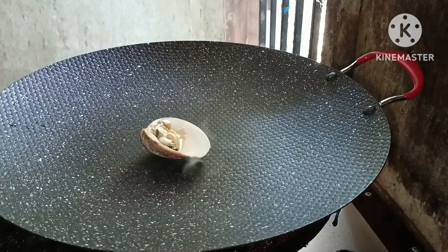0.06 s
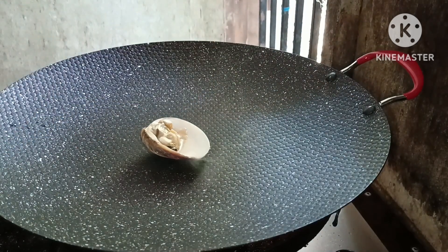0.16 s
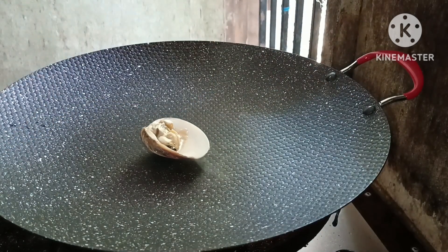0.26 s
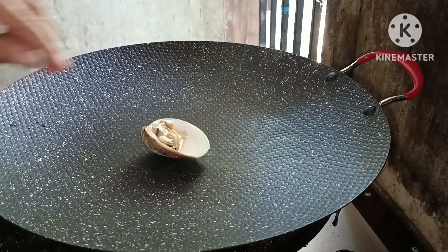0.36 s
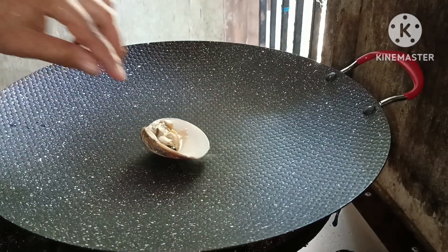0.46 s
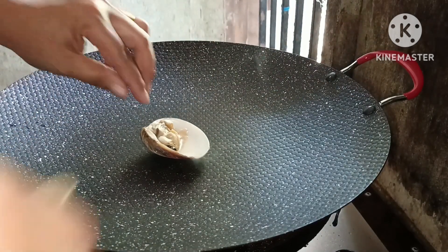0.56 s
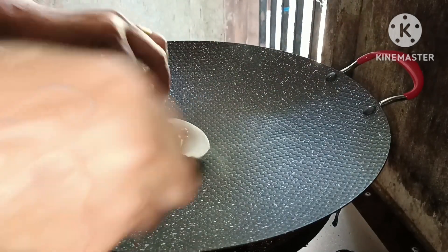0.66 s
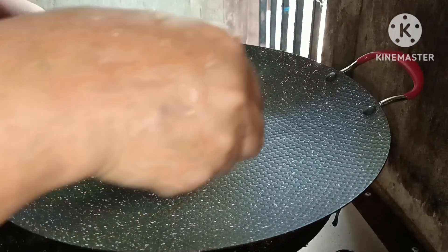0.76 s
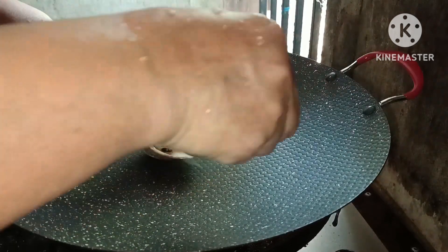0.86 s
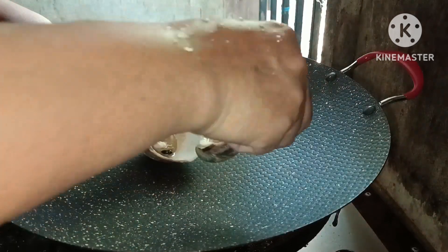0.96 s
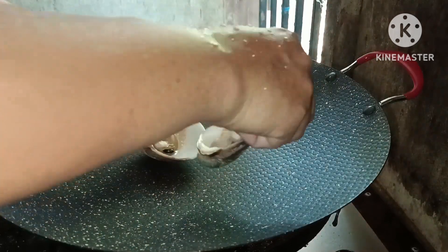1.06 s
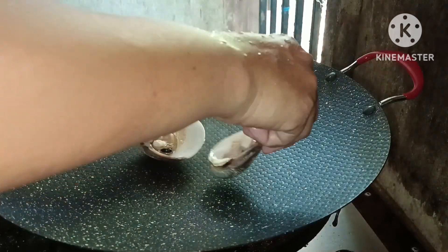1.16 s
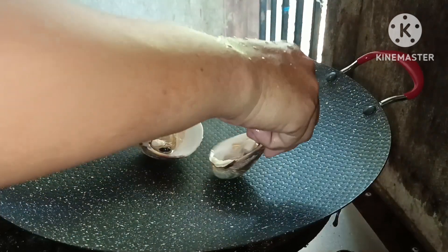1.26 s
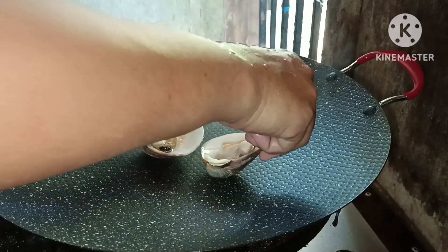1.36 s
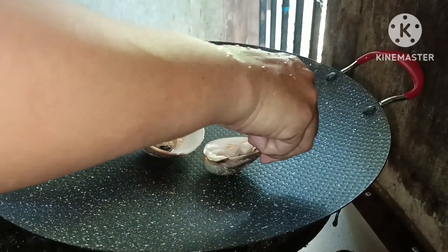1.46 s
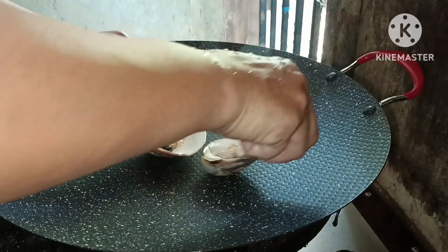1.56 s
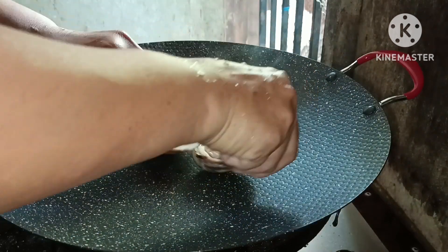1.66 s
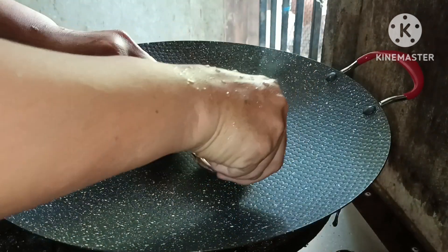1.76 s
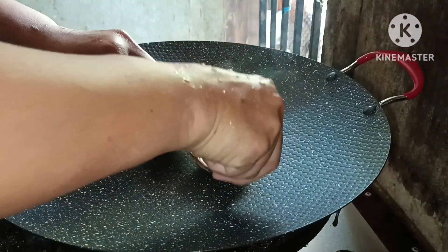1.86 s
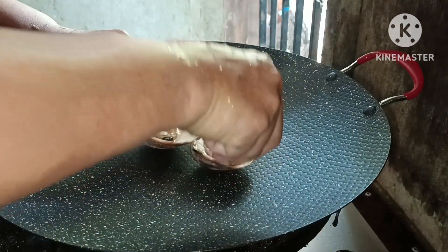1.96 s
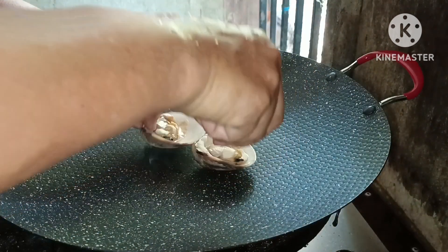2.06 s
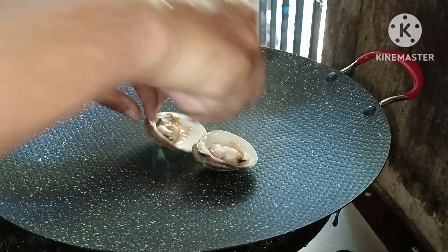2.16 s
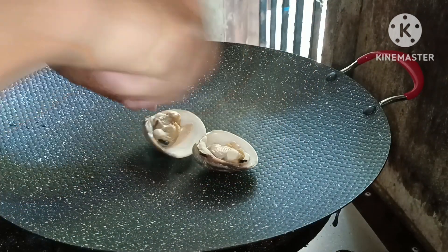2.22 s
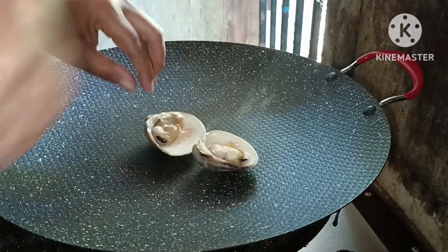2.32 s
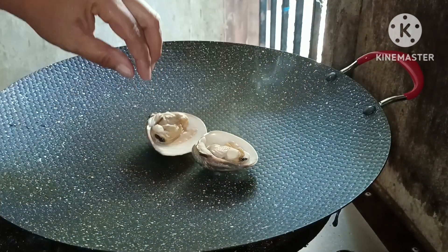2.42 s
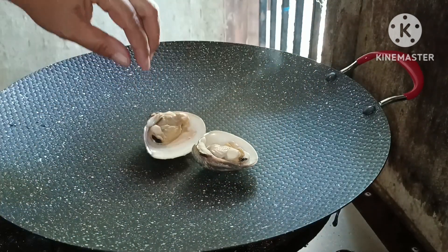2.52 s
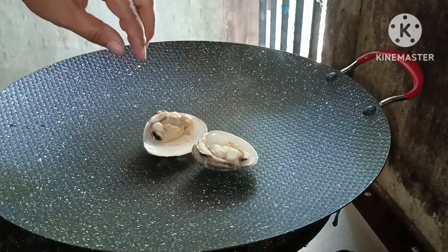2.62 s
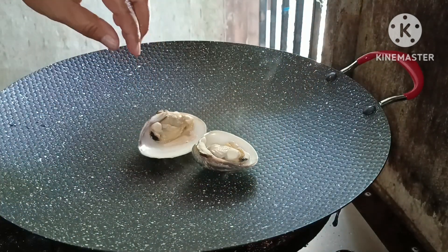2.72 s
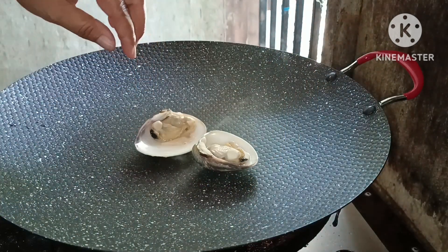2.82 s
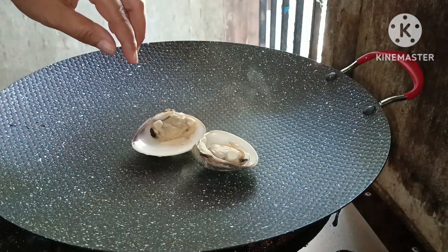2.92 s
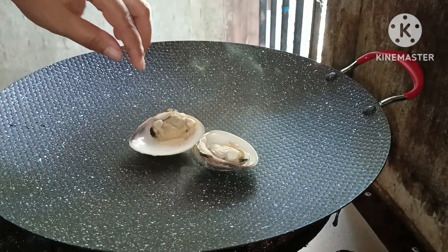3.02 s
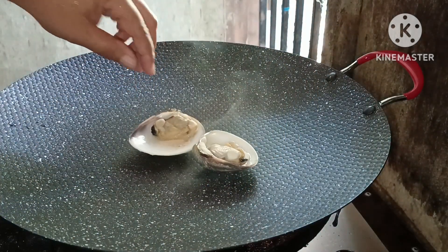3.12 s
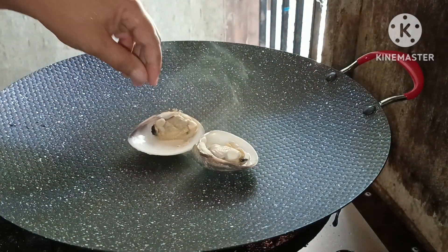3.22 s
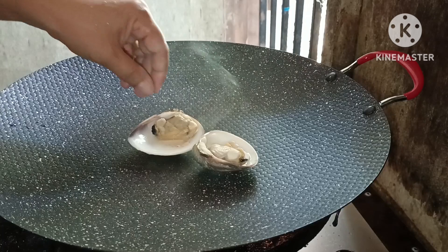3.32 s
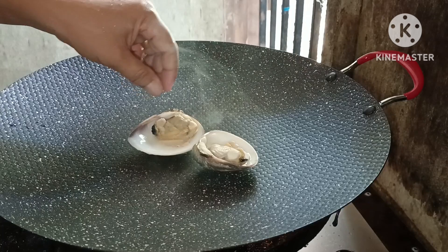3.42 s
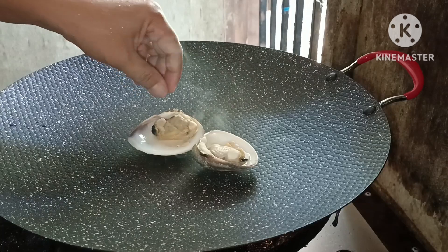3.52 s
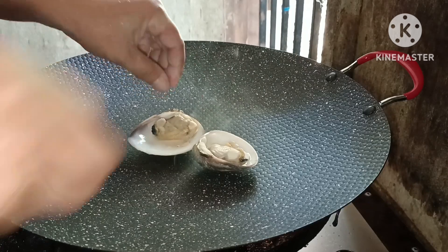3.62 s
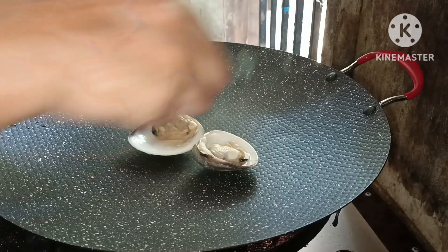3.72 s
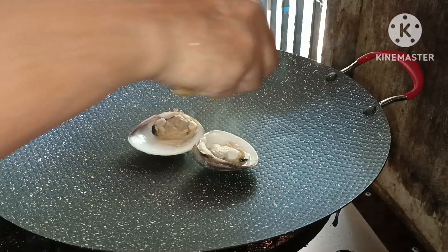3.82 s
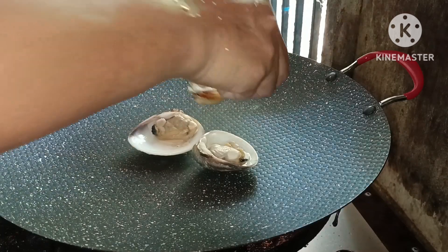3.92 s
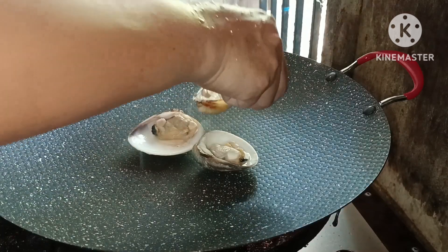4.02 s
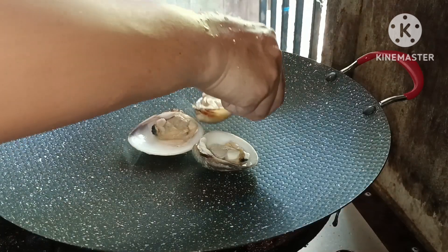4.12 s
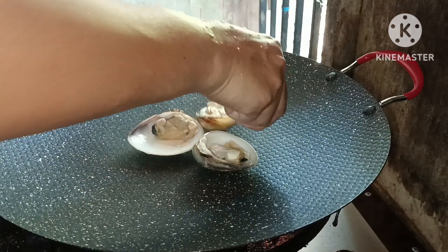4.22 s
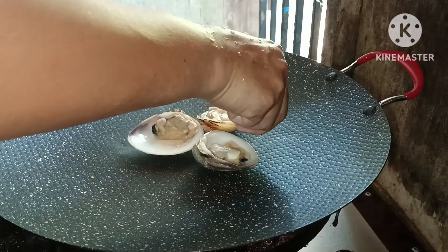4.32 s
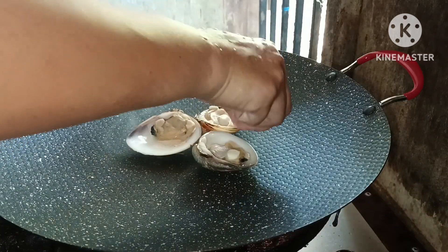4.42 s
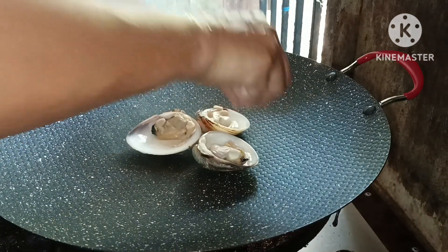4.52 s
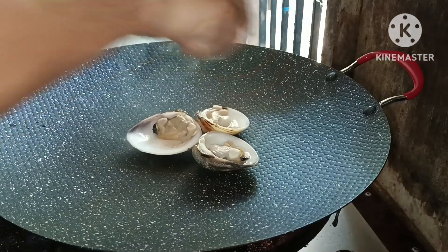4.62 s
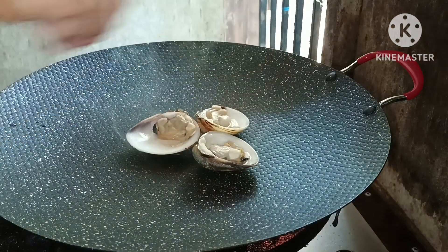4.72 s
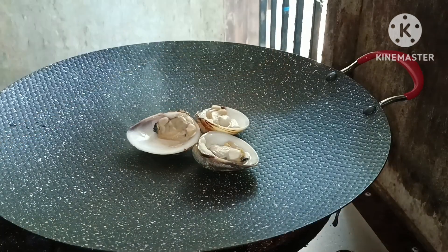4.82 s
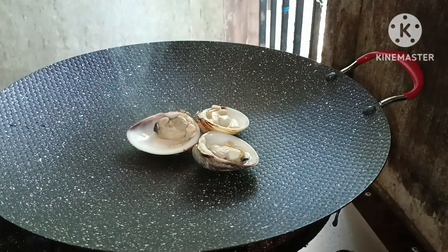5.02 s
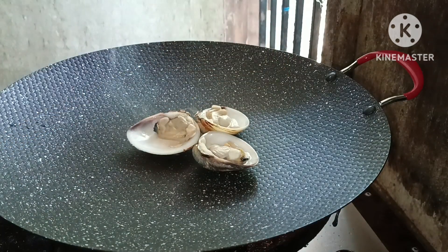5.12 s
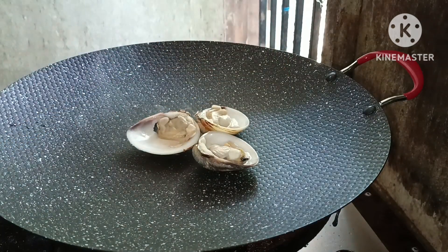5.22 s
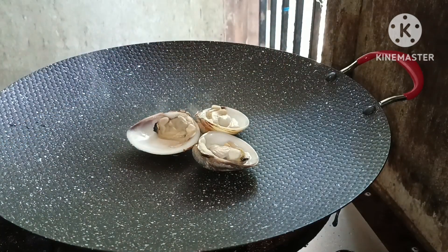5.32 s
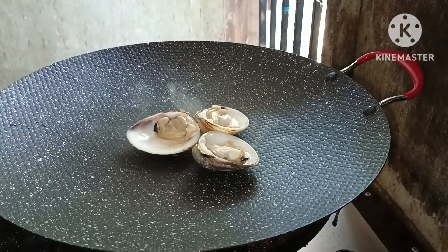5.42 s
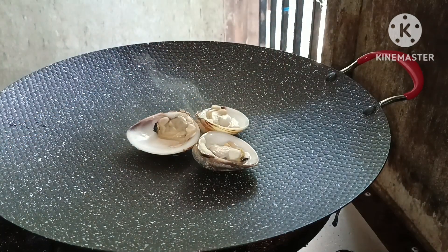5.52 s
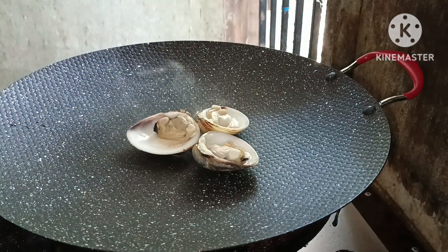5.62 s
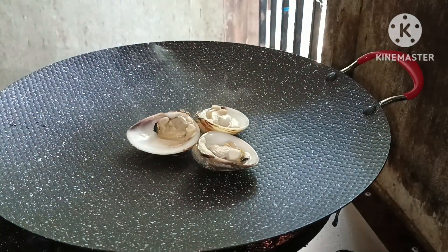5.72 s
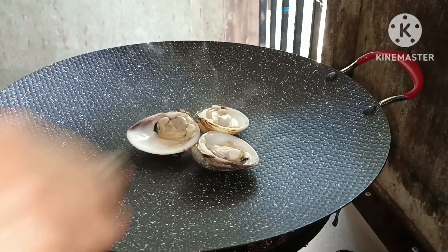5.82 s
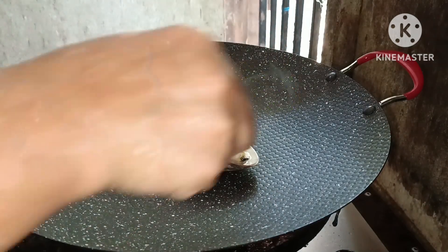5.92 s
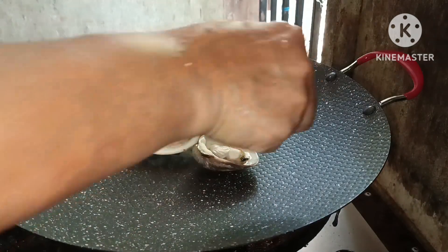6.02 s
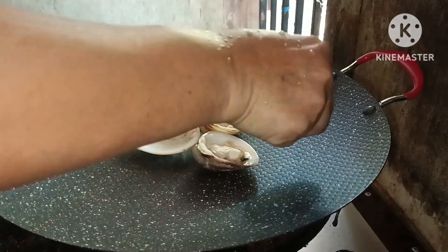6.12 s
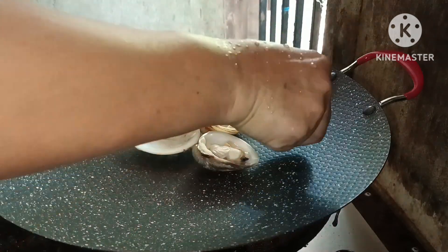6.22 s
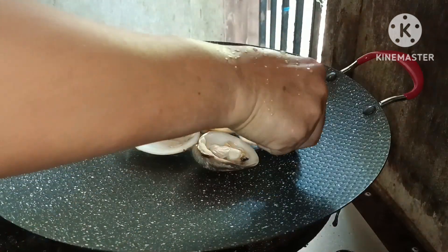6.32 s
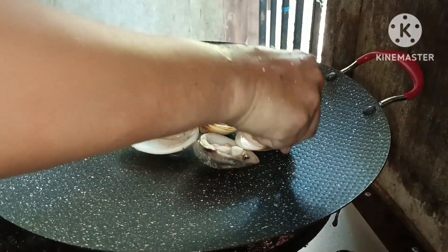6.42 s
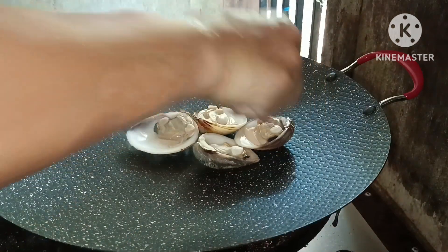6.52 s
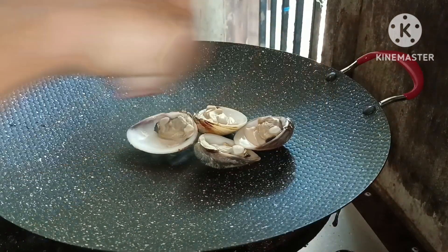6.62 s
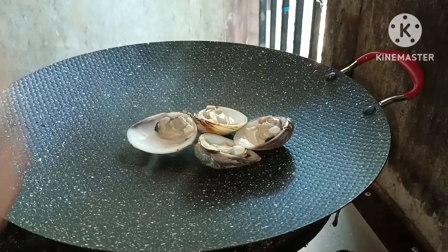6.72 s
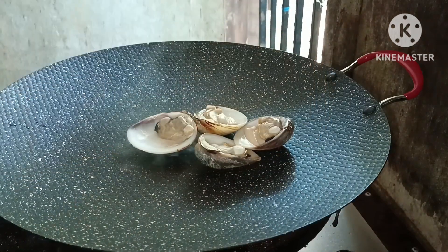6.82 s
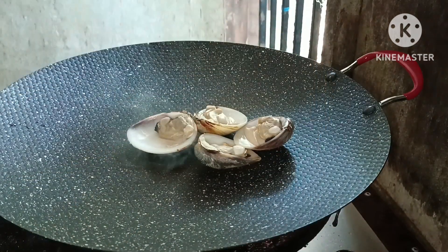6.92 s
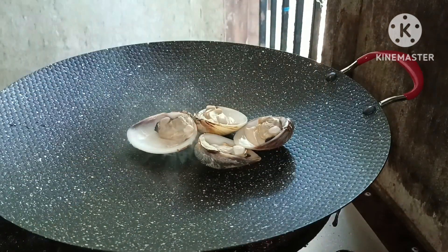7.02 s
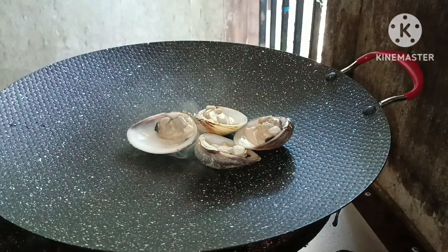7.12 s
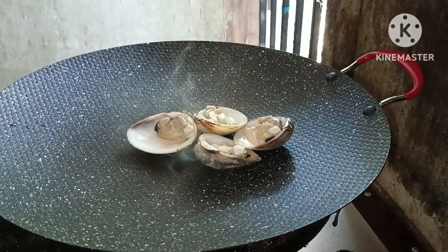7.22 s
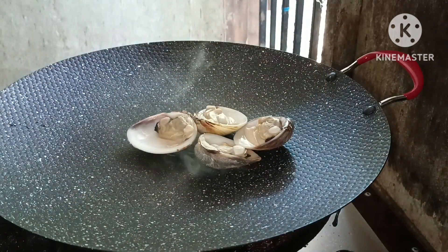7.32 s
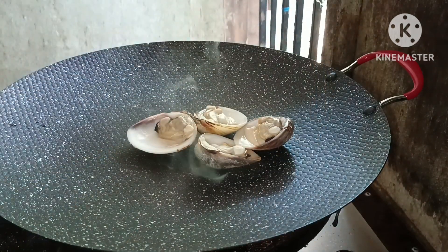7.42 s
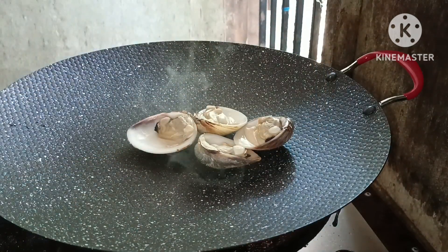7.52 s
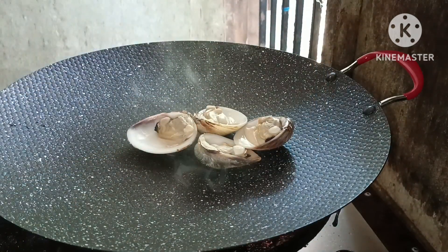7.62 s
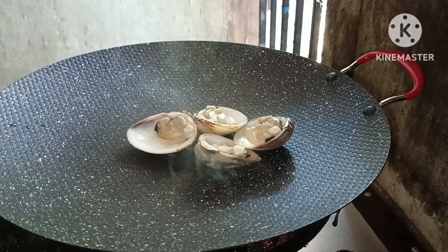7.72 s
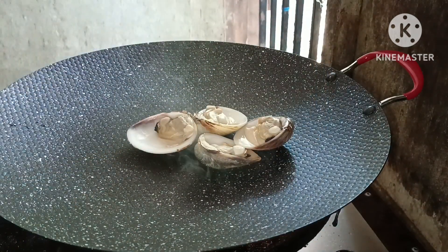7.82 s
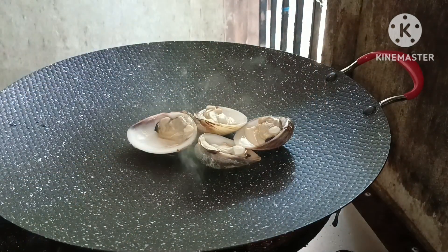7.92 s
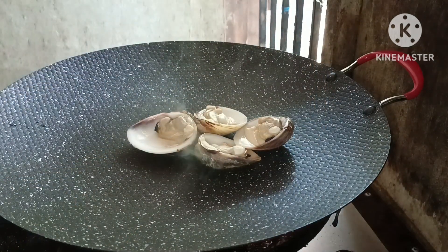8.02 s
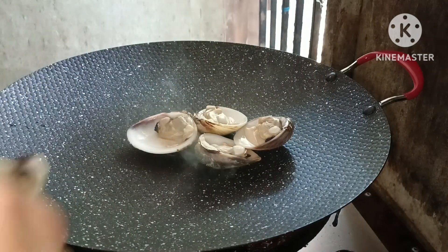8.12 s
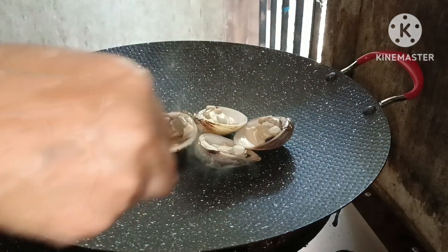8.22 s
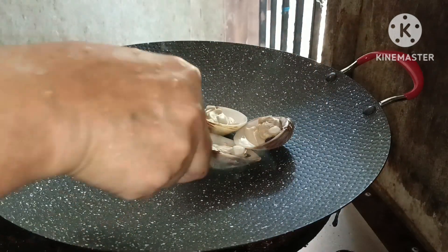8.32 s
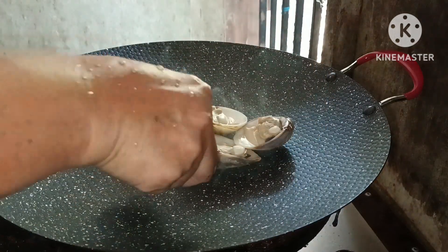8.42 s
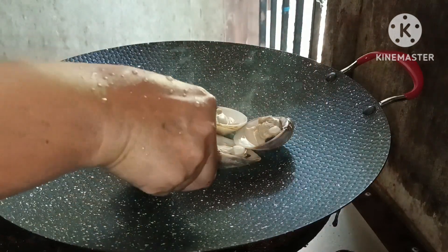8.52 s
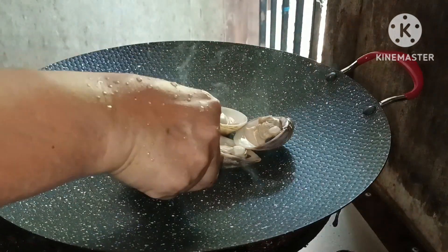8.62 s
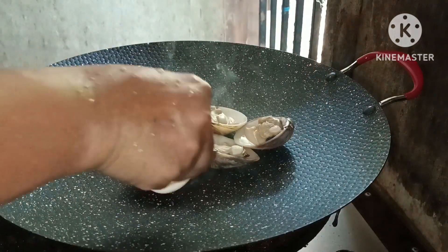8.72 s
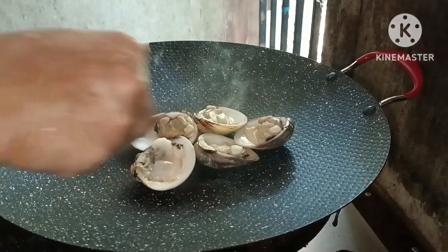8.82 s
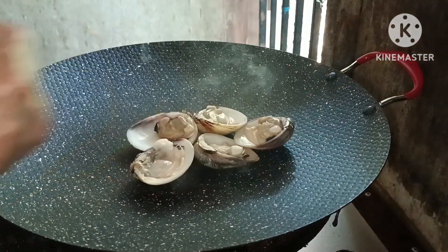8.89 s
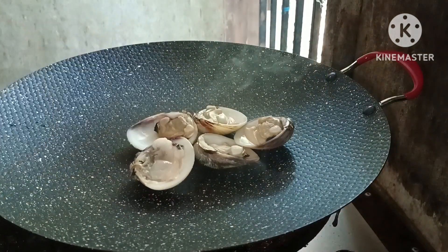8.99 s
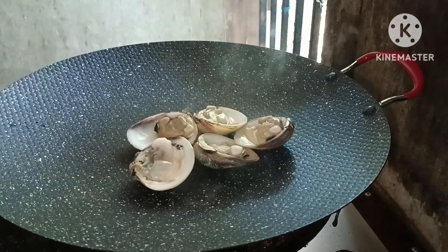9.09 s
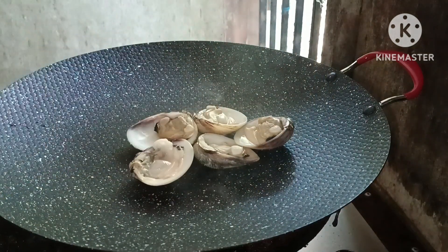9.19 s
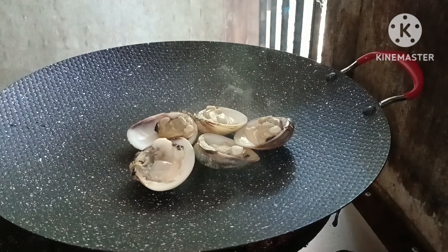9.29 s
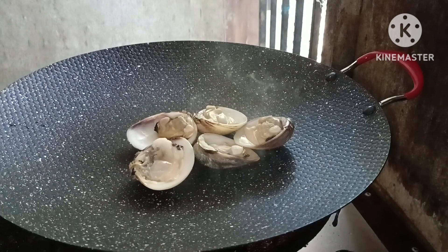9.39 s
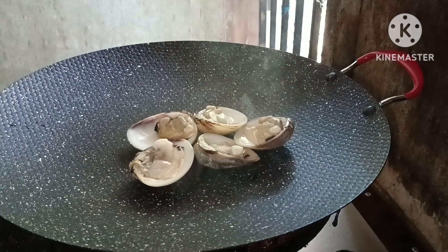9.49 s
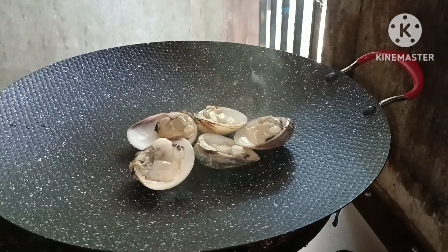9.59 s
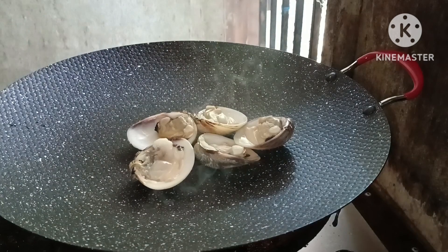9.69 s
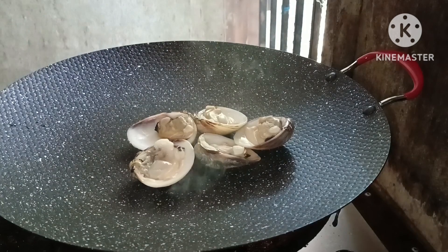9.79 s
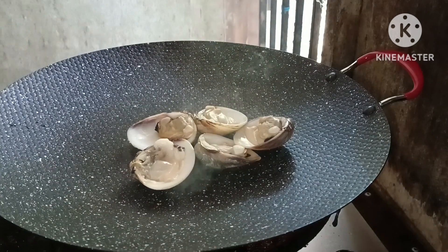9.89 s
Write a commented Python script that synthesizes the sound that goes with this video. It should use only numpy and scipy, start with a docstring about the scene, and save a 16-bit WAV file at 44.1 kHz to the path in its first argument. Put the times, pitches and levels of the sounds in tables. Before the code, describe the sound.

A close stereo view of a hot wok in a small kitchen, with steady low mains hum and soft fan air throughout. Juice already sizzles thinly. From 0.15 to 0.4 s, hand-held shells tick sharply and scrape briefly. Around 1.43 s a shell lands with a modest clack, followed by faint rocking taps until 2.4 s and flares of high, airy fizz. Light ticks and a small scrape come at 3.3 to 3.7 s. At 4.44 s a much louder clack rattles rapidly in a bright, short metallic ring. Small ticks at 5.5 s precede a dull wooden knock near 5.7 s. Another hard, ringing clack hits at 6.47 s, with a strong burst of sizzle and crackling spits until 7.4 s. A faint, wavering steam whistle sinks from 7.4 to 7.8 s. The last sharp clack at 8.73 s rattles briefly, then sizzling continues to the end.

```python
"""Half clams are handled and set down one at a time on a hot wok in a small kitchen, near a phone with two microphones.
Shells tick and grate over juice that already sizzles; a mains hum and a fan run underneath throughout.
Shells land near 1.4, 4.4, 6.5 and 8.7 s: each clacks, rocks onto its rim and rings modes of wok and shell,
while its juice spills, fizzes as random bursts, spits and slowly dries.
More ticks follow at 3.4 and 5.5 s, a dull knock at 5.7 s, and steam whistles faintly under a shell from 7.4 s."""
import sys
import numpy as np
from scipy import signal
from scipy.fft import rfft, irfft
from scipy.io import wavfile
from scipy.ndimage import uniform_filter1d

SR = 44100
rng = np.random.default_rng(int(sys.argv[2]) if len(sys.argv) > 2 else 0)


def persist_wave(psi):
    """Save psi, clipped to +-1, as 16-bit WAV."""
    counts = np.round(np.clip(psi, -1, 1) * 32767).astype(np.int16)
    wavfile.write(sys.argv[1], SR, np.atleast_2d(counts).T)


N = 438794
TIME = np.arange(N) / SR
EDGE_HZ = 15750  # upper band limit
LN_60_DB = np.log(1000)

# contacts of shell and pan: [t/s, level/dB, favoured ring f/Hz, its boost/dB, ring t60/s, extra hardness/(dB/octave)]
CLACKS = [(1.4325, -22.5, 1076, 24, 0.3, 2.5), (1.4352, -28.5, 2121, 10, 0.15, -1),
          (1.481, -37, 2900, 10, 0.14, 2), (1.518, -42, 1076, 32, .12, -2),
          (1.787, -42.5, 2130, 9, 0.25, -3), (1.8, -48, 567, 23, .15, -4), (1.85, -45, 1500, -14, 0.38, 7),
          (2.242, -40.5, 1140, 27, 0.14, -7), (2.246, -49, 2110, 20, 0.31, -3),
          (2.301, -43.5, 1290, 18, 0.22, -4), (2.385, -45.5, 3900, 14, 0.13, -1),
          (4.4401, -13.5, 840, 23, 0.14, -.5), (4.442, -18.5, 1085, 23, 0.12, -1),
          (4.446, -15.5, 2120, 2, 0.16, -1.5), (4.455, -9.5, 2100, 16, 0.13, -0.5),
          (4.4623, -18, 1700, 28, 0.29, 0), (4.470, -12, 2145, 10, 0.18, -1.5),
          (4.481, -20, 4400, 14, 0.25, -1.5), (4.527, -28, 2500, 13, 0.11, 4),
          (4.553, -32, 1465, 16, 0.24, 1), (4.599, -33.5, 2080, 14, 0.11, 3), (4.616, -42, 2500, 12, .3, 3),
          (4.664, -49, 845, 9, .1, 1), (5.448, -38, 1230, 7, 0.053, 2), (5.534, -41, 2020, 29, 0.082, 2),
          (5.536, -45, 4030, 28, .08, 11), (5.547, -41.5, 3850, 24, 0.091, 3),
          (5.608, -42.5, 2100, 18, .07, 5), (6.4654, -14.5, 598, 19.5, 0.22, 1),
          (6.466, -15.5, 3120, 9, 0.17, 0.5), (6.467, -17, 2170, 28, .24, 0),
          (6.473, -12.5, 2130, 28, 0.25, 0), (6.481, -23, 3120, 4, 0.33, 2), (6.533, -33, 1180, 18, .1, -5),
          (8.7336, -10.5, 2980, 21, 0.19, 1.3), (8.7344, -17, 1140, 13, 0.046, -3),
          (8.741, -17.5, 1690, 12, 0.25, 2), (8.745, -18, 2115, 13, 0.11, 4),
          (8.752, -16, 3250, 11, 0.27, 2.5), (8.768, -35, 4500, 14, 0.15, -3),
          (8.775, -35, 6100, 27, 0.08, 6), (8.793, -35, 560, 16, 0.083, -5),
          (8.812, -31, 1720, 22, 0.12, 0), (8.856, -33, 1160, 24, 0.083, 4), (8.876, -39, 2500, 11, .14, 1),
          (8.893, -46, 1150, 16, 0.11, -1)]
# spectrum of a dry shell contact before hardness: [f/Hz, relative density/dB]
CONTACT_SPECTRUM = [(300, -79), (1400, -20.5), (2400, -4.5), (3600, 1.5), (5800, 2.5), (7500, -4),
                    (11500, 4), (16000, 0)]


def amp(db):
    """Amplitude factor of a level in dB."""
    return 10 ** (np.asarray(db) / 20)


def unit(x):
    """Scales to rms 1."""
    return x / np.sqrt(np.mean(x ** 2) + 1e-20)


def read(points, hz):
    """Reads a table on a log-frequency axis."""
    f, value = np.transpose(points)
    return np.interp(np.log(hz + 1), np.log(f + 1), value)


def add(mix, s, sound):
    """Mixes a stereo sound in at time s."""
    part = mix[:, round(s * SR):][:, :sound.shape[1]]
    part += sound[:, :part.shape[1]]


def colour(x, db_at):
    """Filters by a function from Hz to dB."""
    gain = amp(db_at(np.fft.rfftfreq(x.shape[-1], 1 / SR)))
    return irfft(rfft(x) * gain, x.shape[-1])


def peak(hz, centre, width):
    """Power response of a resonance, 1 at its centre."""
    return 1 / (1 + ((hz - centre) / width) ** 2)


def drift(rate_hz, count=24):
    """Slow chance of rms 1: random-phase sines no faster than the rate, equal power per hertz-octave ratio 1/f."""
    t = TIME[::128]
    rates_hz = np.geomspace(rate_hz / 10, rate_hz, count)
    waves = sum(np.sin(2 * np.pi * (f * t + rng.random())) / np.sqrt(f) for f in rates_hz)
    return np.interp(TIME, t, unit(waves))


def one_pole(x, r):
    """Smooths by a one-pole lowpass of unit gain at 0 Hz."""
    return signal.lfilter([1 - r], [1, -r], x)


def dying_noise(t, t60s):
    """Stereo noise whose bands each die at their own speed."""
    hz, at, z = signal.stft(rng.standard_normal((2, len(t))), SR, nperseg=256)
    decay = amp(-60 * at / read(t60s, hz)[:, None])
    return signal.istft(z * decay, SR, nperseg=256)[1][:, :len(t)]


def ports(x, delay_samples=14):
    """Direct sound reaches the right microphone slightly after the left."""
    return np.array([x, np.pad(x, (delay_samples, 0))[:len(x)]])


def tilt(hz, slope_db_per_octave):
    """A harder contact is brighter: spectral slope about 2600 Hz."""
    return slope_db_per_octave * np.log2(np.clip(hz, 700, 12000) / 2600)


def touch(s, db, window_s=.04, rock_s=0.014):
    """Hardness (dB/octave) and thud (dB) from force and time since the first contact in the window."""
    landed_s = min(row[0] for row in CLACKS if row[0] > s - window_s)
    on_rim = 1 - np.exp(-((s - landed_s) / rock_s) ** 2)
    # softer is duller; on its rim the shell is brighter, with less thud
    return 1 + 0.2433 * db + 2.5 * on_rim, -1 - 7.5 * on_rim


def attack_unit(x):
    """Scales to rms 1 over the first 20 ms."""
    return x / np.sqrt(np.mean(x[:, :SR // 50] ** 2))


def clacks(modes_db=-6.0, clatter_db=-4.0, crack_db=-6.0, shell_db=2.5, free_t60_s=0.21,
           favour_share=0.057, cluster_share=0.0038, swell_s=0.00044, crack_s=0.00052):
    """Each contact cracks, excites decaying modes of wok and shell and leaves a dense clatter in the room."""
    # wok modes: [f/Hz, left level/dB, right level/dB, lead of left/rad], levels relative
    wok_modes = [(260, -28, -22, -1), (539, -21, -28, 1.5), (605.5, -29, -21, 0.8), (845, -19.5, -27, -3),
                 (1193, -23, -9, 1.6), (1466, -14, -11, -2.5), (1689, -14, -13, -2.5),
                 (1902, -20, -13, 1.9), (2023, -13, -15, .1), (2094, -6, -7, -1.1), (2315, -11, -9, .3),
                 (2386, -12, -12, -2.8), (2500, -11, -17, -2.2), (2548, -11, -16, -1),
                 (2686, -11, -13, -.4), (2840, -13, -14, .1), (3004, -8, -8, 1), (3090, -9, -19, 2.5),
                 (3220, -8, -10.5, 0.5), (3260, -12, -18, 2.5), (3580, -10, -13, 4), (3935, -20, -11, 0),
                 (3990, -18, -13.5, -1.2), (4630, -24, -25, 4), (4920, -27, -17, -3.5),
                 (5550, -21, -23, 8.5), (5800, -23, -30, 1), (6700, -35, -23, 3), (6850, -30, -42, 10),
                 (8210, -15, -13.5, -4.5)]
    # added modes of each shell in order of landing, same columns, before shell_db
    shell_modes = [
        [(1078, -28, -8.5, -2.5), (1426, -4, -8, 2.5), (1500, -10, -4, -3.5), (2135, -6, -5.5, -1),
         (2240, -19, -16, 3), (2765, -0.5, -3, -0.5), (3539, -12, -1.5, 3), (4450, -16, -18, -2.3),
         (4540, -19, -17, -2), (4800, -28, -14, -3), (5450, -23, -16, -1), (5956, -16, -18, 0)],
        [(787, -27, -24, -0.5), (922, -26, -20, 3), (1080, -21, -16, 1.8), (1118, -19, -17, 1),
         (1510, -14, -16, 0.5), (2200, -12, -9, 2), (2400, -17, -11, -3.5), (2770, -8, -5, 1.5),
         (3410, -13, -9, 2), (3580, -24, -10, 0), (4140, -16, -13, 0.1), (4470, -21, -15, -3),
         (4900, -17, -28, -3), (5400, -28, -22, 6), (5970, -26, -28, -2.4), (6840, -32, -21, 3)],
        [(419, -20, -18, 1), (754, -17, -18, -2.5), (1095, -22, -16, 2.5), (1190, -19, -19, 2.5),
         (1483, -14.5, -13, -2.2), (1760, -14, -15, 1.5), (2260, -9, -15, -2.5), (3110, -10, -4.5, 2.3),
         (3390, -4, -10, 2), (3460, -14, -13, 1.5), (3649, -21, -6, 1), (4590, -16, -18, 2),
         (4858, -24, -24, -2.6), (4984, -27, -24, 1), (5335, -23, -20, .3), (5510, -24, -24, -2),
         (5780, -22, -28, 2), (6000, -30, -28, 3), (6730, -31, -38, 8)],
        [(1097, -22, -15, 2.5), (1135, -24, -18.5, -2), (1460, -6, -11, -4), (1620, -13, -17, 3.5),
         (1694, -17, -16, -1.5), (2126, -11, -13, 1), (2790, -9, -9, -1), (2925, -17, -12, 0),
         (3120, -17, -14, 0.5), (3660, -16, -8, -2.5), (4480, -15, -17, 1.5), (4580, -15, -17, 1),
         (5332, -25, -33, -1.8), (5500, -26, -31, -2.8), (6136, -32, -29, -1)],
    ]
    # times from which the next shell's modes apply: [t/s]
    next_shell_s = [4, 6, 8]
    # dense ring between the modes: [f/Hz, level on the scale of the modes/dB]
    clatter_spectrum = [(120, -29), (300, -32.5), (700, -28), (1100, -23), (1700, -18), (2900, -11.5),
                        (3700, -16), (4700, -27), (6000, -40), (7300, -31), (10000, -20), (16000, -24)]
    # its decay before the contact's damping: [f/Hz, t60/s]
    clatter_t60 = [(250, 0.3), (1500, 0.21), (3000, 0.26), (6000, 0.27), (12000, 0.099)]

    out, t = np.zeros((2, N)), np.arange(16384) / SR
    bins_hz = np.fft.rfftfreq(len(t), 1 / SR)
    tables = [np.array(wok_modes + shell) for shell in shell_modes]
    start_phases = 2 * np.pi * rng.random(max(map(len, tables)))
    for s, db, ring_hz, boost_db, t60_s, extra_db in CLACKS:
        mode_hz, left_db, right_db, lead = tables[np.searchsorted(next_shell_s, s)].T
        of_shell = np.arange(len(lead)) >= len(wok_modes)
        mode_db = np.array([left_db, right_db]) + shell_db * of_shell
        hard_db, thud_db = touch(s, db)

        def contact(hz):
            """Place and force of the contact decide which modes speak."""
            thud = thud_db / (1 + (hz / 950) ** 4)
            favour = boost_db / 2 * peak(hz, ring_hz, favour_share * ring_hz)
            return tilt(hz, hard_db + extra_db) + thud + favour

        # the mode nearest the favoured ring stands out of its cluster
        favoured_db = boost_db * .8 * peak(mode_hz, ring_hz, .028 * ring_hz)
        # a rocking shell pushes roughly in step with the ring already there
        phase = start_phases[:len(lead)] + 2 * np.pi * mode_hz * s + .4 * rng.standard_normal(len(lead))
        level = amp(mode_db + contact(mode_hz) + favoured_db)
        heard = level * np.exp(1j * np.array([phase, phase - lead]))
        loss_per_s = LN_60_DB / t60_s * (1 + (mode_hz / 8000) ** 4)  # highest modes die first
        step = np.exp((2j * np.pi * mode_hz - loss_per_s) / SR)
        modes = (heard @ np.vander(step, len(t), increasing=True)).real

        # weaker modes cluster round each main one, with dark valleys between
        shapes = peak(bins_hz, mode_hz[:, None], cluster_share * mode_hz[:, None] + 20)
        clusters = amp(mode_db) ** 2 @ shapes ** 2
        body_db = 10 * np.log10(clusters + amp(read(clatter_spectrum, bins_hz)) ** 2)
        # the contact's t60 shortens or lengthens the clatter too
        held = np.exp(-LN_60_DB * t * (1 / t60_s - 1 / free_t60_s))
        noise = dying_noise(t, clatter_t60) * held
        clatter = colour(noise, lambda hz: body_db + contact(hz)) * (t < .3)

        snap = colour(rng.standard_normal(len(t)), lambda hz: read(CONTACT_SPECTRUM, hz) + contact(hz))
        crack = unit(snap) * np.exp(-t / crack_s)
        ring = amp(modes_db) * attack_unit(modes) + amp(clatter_db) * attack_unit(clatter)
        ring *= 1 - np.exp(-t / swell_s)
        add(out, s, amp(db) * (ring + amp(crack_db) * ports(crack)))
    return out


def ticks(snap_db=4, snap_s=0.00016, edge_db=8, edge_width_hz=400):
    """A shell held in the fingers snaps, rings at its edge and is damped at once."""
    # [t/s, level/dB, hardness/(dB/octave), t60/s, edge ring f/Hz]
    tick_rows = [(0.148, -18, -5.5, 0.061, 5030), (0.214, -19.5, -4.5, 0.043, 11500),
                 (0.2492, -11, -3, 0.032, 3620), (0.255, -25, -3, 0.062, 2460),
                 (0.317, -30, -5.5, 0.14, 2130), (0.355, -32, -1.5, 0.16, 4400),
                 (3.355, -39, -11, 0.1, 5240), (3.382, -33.5, -9, 0.065, 4130),
                 (3.668, -42.5, -3, .05, 5400), (5.448, -25.5, -4, 0.032, 3120),
                 (5.464, -39, -10, .04, 3300), (5.713, -32, -5, 0.07, 4360),
                 (5.726, -27.5, -4, 0.042, 4300)]
    out, t = np.zeros((2, N)), np.arange(SR // 6) / SR
    for s, db, hard_db, t60_s, edge_hz in tick_rows:
        def shape(hz):
            edge = edge_db * peak(hz, edge_hz, edge_width_hz)
            return read(CONTACT_SPECTRUM, hz) + tilt(hz, hard_db) + edge

        noise = unit(colour(rng.standard_normal((3, len(t))), shape))
        ring = noise[:2] * np.exp(-LN_60_DB * t / t60_s)
        snap = ports(noise[2] * np.exp(-t / snap_s))
        add(out, s, amp(db) * (ring + amp(snap_db) * snap))
    return out


def scrapes(slips_per_s=700, hard_db=-4, width_hz=120, grit_s=.0006):
    """Ridges slip over each other; the shell's ring sinks as the point of contact slides."""
    # [t/s, length/s, level/dB, start resonance f/Hz, end resonance f/Hz, resonance level re rasp/dB]
    scrape_rows = [(0.263, .076, -37, 2420, 2030, -10), (3.324, 0.073, -44, 5200, 5130, -3)]
    out, t = np.zeros((2, N)), np.arange(SR // 6) / SR
    r = np.exp(-np.pi * width_hz / SR)
    for s, length_s, db, from_hz, to_hz, ring_db in scrape_rows:
        along = np.clip(t / length_s, 0, 1)
        slips = (rng.random(len(t)) < slips_per_s / SR) * rng.uniform(.5, 1, len(t))
        slips = slips * np.sin(np.pi * along).clip(0) ** .25
        pulses = signal.lfilter([1], [1, -np.exp(-1 / (grit_s * SR))], slips)
        grit = pulses * rng.standard_normal((2, len(t)))
        # gliding resonance: shift down to 0 Hz, smooth, shift back
        turn = np.exp(2j * np.pi * np.cumsum(from_hz + (to_hz - from_hz) * along) / SR)
        ring = (turn * one_pole(grit / turn, r)).real
        rasp = colour(grit, lambda hz: read(CONTACT_SPECTRUM, hz) + tilt(hz, hard_db))
        level = amp(db) * np.sqrt(length_s / t[-1])  # unit() averages over the whole buffer
        add(out, s, level * (unit(rasp) + amp(ring_db) * unit(ring)))
    return out


def kitchen(x, t60_s=.35):
    """A short diffuse echo from the walls, dying faster in the treble."""
    t = np.arange(SR // 2) / SR
    tail = dying_noise(t, [(1000, t60_s), (12000, t60_s / 2)]) * (t > .004)
    return signal.fftconvolve(x, tail / np.linalg.norm(tail[0]), axes=1)[:, :N]


def bubbles(per_s, spread_db, wash):
    """Tiny random bursts over the wash of their reflections."""
    sizes = amp(spread_db * np.minimum(rng.exponential(1, N), 5)) * (rng.random(N) < per_s / SR)
    bursts = unit(sizes * rng.standard_normal((2, N)))
    return unit(bursts + wash * rng.standard_normal((2, N)))


def wetness(puddle_rise_s=0.015, fizz_dry_db_per_s=3.5, simmer_dry_db_per_s=0.85,
            spill_rise_s=0.024, spill_fade_s=0.066):
    """Gains of fizz and simmer: puddles dry slowly; a spill flares up, holds while it runs and boils off."""
    # wet patch left by each shell: [t/s, relative fizz/dB, relative simmer/dB]
    puddles = [(0, -38.5, -53.5), (1.432, -43.5, -54), (4.4405, -47, -53), (6.4655, -39, -42),
               (8.7341, -36.5, -45.5)]
    # juice running onto hot metal: [t/s, relative fizz/dB, length of run/s]
    spills = [(.08, -42.5, 0.36), (.52, -38.5, 0.45), (1.405, -31.5, 0.24), (1.67, -34, 0.26),
              (2.16, -45, 0.046), (2.32, -33.5, 0.088), (2.57, -45, 0.12), (2.86, -48, 0.066),
              (3.23, -41, .07), (3.32, -38.5, .81), (3.54, -38, .04), (4.22, -42.5, 0.24), (6.41, -41, .06),
              (6.48, -36, 0.43), (6.57, -26.5, 0.048), (7.13, -41, 0.3), (8.05, -43, 0.4),
              (8.73, -38.5, 0.14), (9.06, -37, 0.12), (9.35, -37.5, .6)]
    t = TIME[::64]

    def since(s):
        return np.maximum(t - s, 0)

    def puddle(s, db, dry_db_per_s):
        rise = 1 - np.exp(-since(s) / puddle_rise_s) if s > 0 else 1
        return amp(db - dry_db_per_s * since(s)) * rise

    fizz_power = sum(puddle(s, db, fizz_dry_db_per_s) ** 2 for s, db, _ in puddles)
    simmer_power = sum(puddle(s, db, simmer_dry_db_per_s) ** 2 for s, _, db in puddles)
    for s, db, length_s in spills:
        rise = 1 - np.exp(-since(s) / spill_rise_s)
        fade = np.exp(-since(s + length_s) / spill_fade_s)
        fizz_power += (amp(db) * rise * fade) ** 2
    return np.interp(TIME, t, np.sqrt(fizz_power)), np.interp(TIME, t, np.sqrt(simmer_power))


def off_the_wall(x, delay_s=0.0013, roam_s=0.00034, ripple_db=2.6):
    """The bubbling spot roams, so its echo from the wok's wall combs the hiss ever differently."""
    hz, at, z = signal.stft(x, SR, nperseg=512)
    roam = np.array([np.interp(at, TIME, drift(0.65)) for side in x])
    delay = delay_s + roam_s * roam
    comb_db = ripple_db * np.cos(2 * np.pi * hz[:, None] * delay[:, None])
    return signal.istft(z * amp(comb_db), SR, nperseg=512)[1][:, :N]


def sizzle(fizz_db=2, boil_db=2, flutter_db=0.92, crackle_db=-16, spit_s=.0011):
    """Juice flashes to steam on the metal, spits now and then, and simmers under the shells."""
    # bursting drops: [t/s, level before colouring/dB]
    spits = [(2.248, -26), (2.301, -27), (2.456, -17), (5.035, -30), (5.6532, -22.5), (6.610, -24),
             (6.6696, -18), (6.7104, -14.5), (6.8355, -21), (6.9941, -25), (7.3253, -18), (7.4045, -18)]
    # fizz spectrum: [f/Hz, relative density/dB]
    fizz_spectrum = [(2000, -26.5), (5000, -16.5), (7300, -17.5), (8100, -5.5), (8500, -3.5), (9550, 1.2),
                     (11800, -0.8), (13500, -0.5), (14100, -3), (15450, 0), (16000, -30)]
    # fizz balance: [f/Hz, left minus right/dB]
    fizz_balance = [(6000, -3.5), (8500, -2), (9700, -7), (10400, -1), (11700, -11), (13500, 7.5),
                    (15000, -2)]
    # simmer spectrum: [f/Hz, relative density/dB]
    boil_spectrum = [(900, -9.5), (1900, -13.5), (2900, 0), (4500, -4), (7000, -9.5), (10000, -0.5)]

    crackle = bubbles(per_s=350, spread_db=0.0, wash=.3)  # sparser pops through the hiss
    hiss = bubbles(per_s=2900, spread_db=-2.5, wash=2.3)
    steam, simmer = wetness()
    fizz = (hiss + amp(crackle_db) * crackle) * amp(flutter_db * drift(55))
    fizz *= amp(fizz_db) * steam
    t = np.arange(SR // 50) / SR
    for s, db in spits:
        add(fizz, s, amp(db) * rng.standard_normal((2, len(t))) * np.exp(-t / spit_s))

    def shape(hz):
        return read(fizz_spectrum, hz) + np.array([[.5], [-.5]]) * read(fizz_balance, hz)

    # gain of the colouring on white noise, within the band limit
    heard_db = 10 * np.log10(np.mean(amp(shape(np.arange(EDGE_HZ))) ** 2) * 2 * EDGE_HZ / SR)
    fizz = colour(fizz, lambda hz: shape(hz) - heard_db)
    boil = unit(colour(bubbles(per_s=1300, spread_db=-1.0, wash=2.1), lambda hz: read(boil_spectrum, hz)))
    return off_the_wall(fizz + amp(boil_db) * simmer * boil)


def squeal(start_s=7.41, length_s=0.39, level_db=-46.5, waver_share=0.0042, waver_hz=10, sag_per_s=.1):
    """Steam whistles faintly through the gap under a shell; the pitches waver and sink as the gap changes."""
    # whistles: [f/Hz, width/Hz, relative level/dB]
    whistles = [(2940, 120, -0.5), (3500, 350, -8), (3950, 300, -2), (4670, 410, -5)]
    swell = np.sin(np.pi * np.clip((TIME - start_s) / length_s, 0, 1)).clip(0) ** .5
    sag = sag_per_s * np.clip(TIME - start_s, 0, length_s)
    out = 0
    for hz, width_hz, db in whistles:
        noise = rng.standard_normal((2, N))
        fuzz = unit(colour(noise, lambda f: 20 * np.log10(peak(f, 0, width_hz / 2))))
        pitch_hz = hz * (1 + waver_share * drift(waver_hz) - sag)
        out = out + amp(db) * fuzz * np.sin(2 * np.pi * np.cumsum(pitch_hz) / SR)
    return amp(level_db) * swell * unit(out)


def knock(start_s=5.698, rise_s=0.0058):
    """A dull knock of something wooden rings a few low modes."""
    # [f/Hz, level/dB, t60/s]
    knock_modes = [(148, -29.5, 0.22), (225.6, -36.5, 0.66), (331, -38.5, 0.39)]
    out, t = np.zeros((2, N)), np.arange(SR // 2) / SR
    ring = sum(amp(db - 60 * t / t60_s) * np.sin(2 * np.pi * hz * t) for hz, db, t60_s in knock_modes)
    add(out, start_s, ports(ring * (1 - np.exp(-t / rise_s))))
    return out


def bumps(centre_hz=210, steep_db=14):
    """Soft low rumbles come and go: noise round one low pitch under bell-shaped swells."""
    # [middle t/s, half length/s, level/dB]
    bump_rows = [(0.354, 0.058, -48.5), (3.308, 0.18, -49.5), (4.003, 0.2, -57), (5.846, 0.37, -50.5),
                 (6.85, 0.29, -54.5), (7.554, 0.22, -51.5)]
    swell = sum(amp(db) * np.exp(-((TIME - s) / half_s) ** 2) for s, half_s, db in bump_rows)
    rumble = colour(rng.standard_normal(N), lambda hz: -steep_db * np.log2((hz + 1) / centre_hz) ** 2)
    return ports(swell * unit(rumble))


def fan(fan_db=-45.0, mono_hz=290, swell_db=0.75):
    """Air noise through the resonances of the housing; only the bass is alike at both microphones."""
    # air spectrum: [f/Hz, relative density/dB]
    air_spectrum = [(20, -13), (55, 3.5), (80, -2), (130, -1.5), (220, -12.5), (320, -12), (620, -23),
                    (950, -17.5), (1400, -20), (2500, -16.5), (6500, -33), (16000, -58)]
    # housing resonances: [f/Hz, width/Hz, relative level/dB]
    housing_modes = [(416, 66, -2), (481, 46, 2), (769, 84, -7), (816, 29, -2)]

    def shape(hz):
        housing = sum(amp(db) ** 2 * peak(hz, f, width_hz / 2) ** 2 for f, width_hz, db in housing_modes)
        return 10 * np.log10(amp(read(air_spectrum, hz)) ** 2 + housing)

    hz, z = np.fft.rfftfreq(N, 1 / SR), rfft(rng.standard_normal((3, N)))
    same = 1 / (1 + (hz / mono_hz) ** 4)  # power share common to both sides
    air = irfft(np.sqrt(same) * z[2] + np.sqrt(1 - same) * z[:2], N)
    return amp(fan_db + swell_db * drift(8)) * unit(colour(air, shape))


def hum(hz=100, hum_db=-33.5, waver_db=0.53, wander_cycles=.012):
    """A sine at twice the mains frequency, wavering slightly."""
    tone = np.sin(2 * np.pi * (hz * TIME + wander_cycles * drift(3)))
    return amp(hum_db + waver_db * drift(10)) * tone * amp([[.25], [-.25]])


def draught(draught_db=-59, top_hz=45):
    """Slow air at each microphone port rumbles on its own."""
    noise = rng.standard_normal((2, N))
    return amp(draught_db) * unit(colour(noise, lambda hz: -10 * np.log10(1 + (hz / top_hz) ** 6)))


def scene(tick_room_db=-10):
    """Sums handling with its room echo, clacks, sizzle and background."""
    handled = ticks() + scrapes()
    shells = clacks() + handled + amp(tick_room_db) * kitchen(handled)
    return shells + sizzle() + squeal() + knock() + bumps() + fan() + hum() + draught()


def level_db(x, samples):
    """Running power of both sides together, in dB."""
    return 10 * np.log10(abs(uniform_filter1d((x ** 2).mean(0), size=samples)) + 1e-12)


def held_peak(x, fall_per_s):
    """Holds peaks, falling at a steady rate."""
    fall = TIME * fall_per_s
    return np.maximum.accumulate(x + fall) - fall


def ride(x, from_db=-29, share=0.076, recover_db_per_s=0.6, settle_s=0.068):
    """Slow gain control: everything dips a little after a loud clack and creeps back."""
    duck_db = held_peak(share * np.maximum(level_db(x, 440) - from_db, 0), recover_db_per_s)
    return x / amp(one_pole(duck_db, np.exp(-1 / (settle_s * SR))))


def record(dry, limit_db=-9.3, recover_db_per_s=300, ceiling=1):
    """Quick limiter, slow gain control, soft rounding of peaks, then the band limit."""
    over_db = np.maximum(held_peak(level_db(dry, 220), recover_db_per_s) - limit_db, 0)
    limited = ride(dry / amp(uniform_filter1d(over_db, size=60)))
    rounded = limited / (1 + (limited / ceiling) ** 4) ** (1 / 4)
    lowpass = signal.firwin(511, EDGE_HZ, window=("kaiser", 9), fs=SR)
    return signal.oaconvolve(rounded, lowpass[None], "same")


dry = scene()
out = record(dry)
persist_wave(out)
```